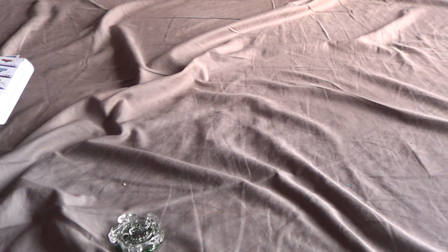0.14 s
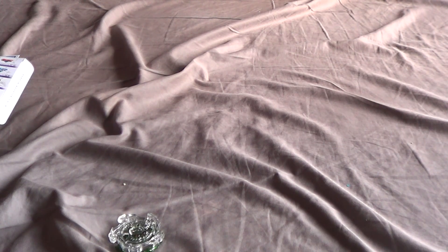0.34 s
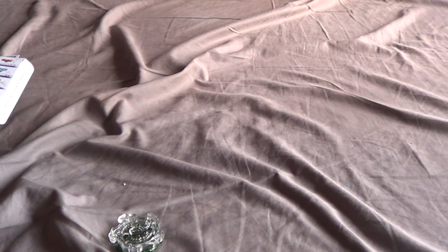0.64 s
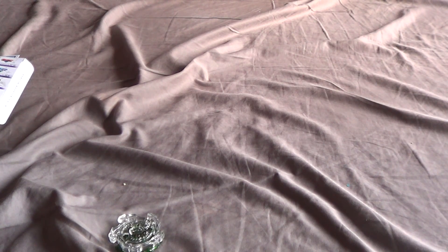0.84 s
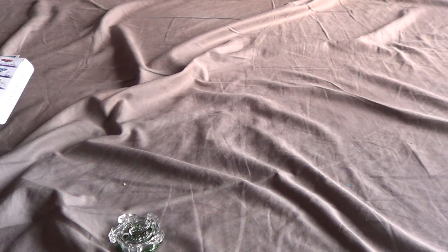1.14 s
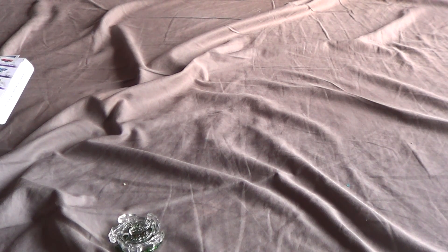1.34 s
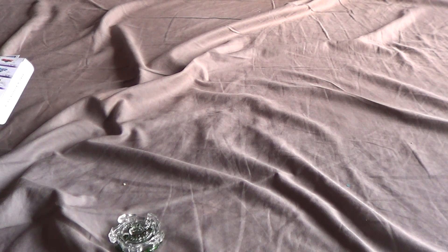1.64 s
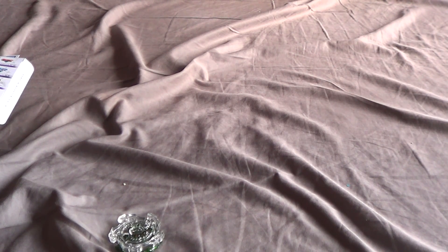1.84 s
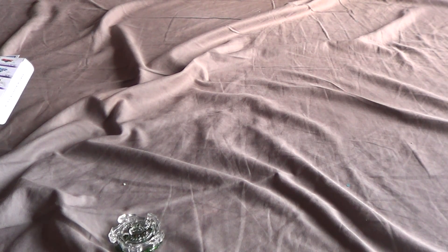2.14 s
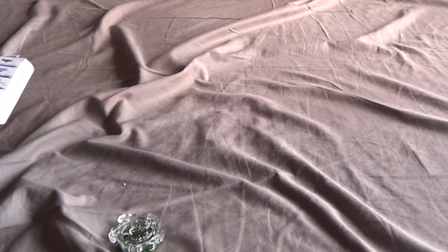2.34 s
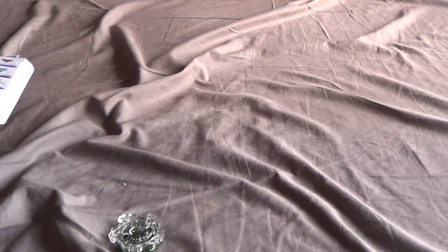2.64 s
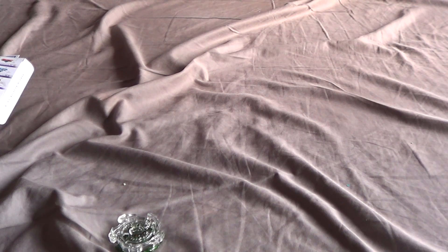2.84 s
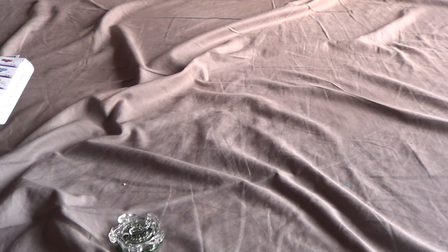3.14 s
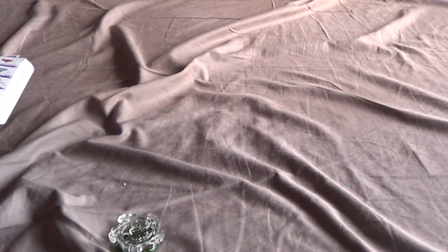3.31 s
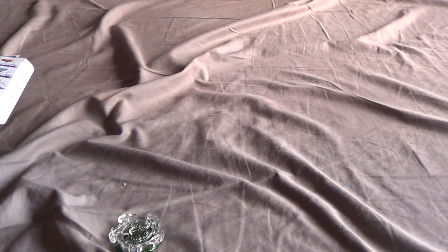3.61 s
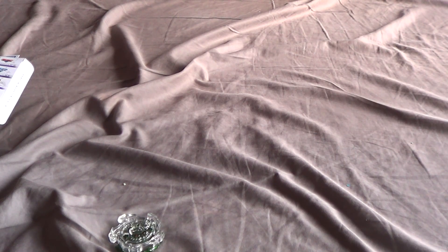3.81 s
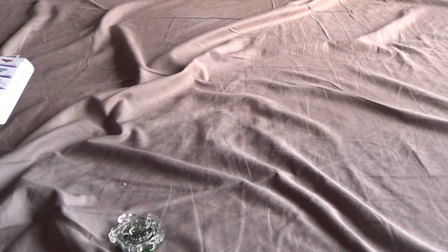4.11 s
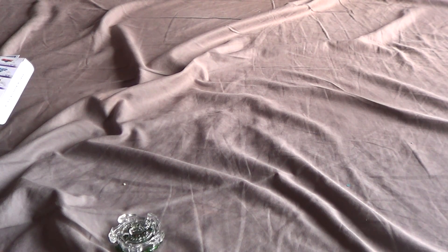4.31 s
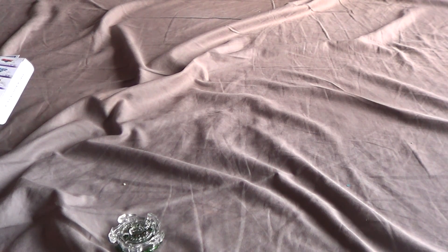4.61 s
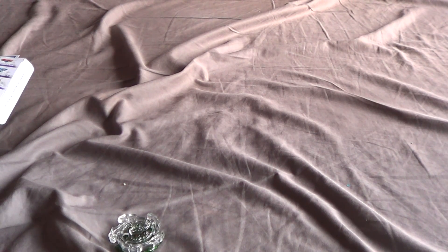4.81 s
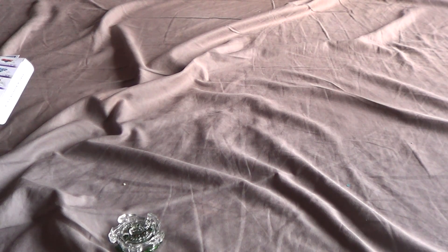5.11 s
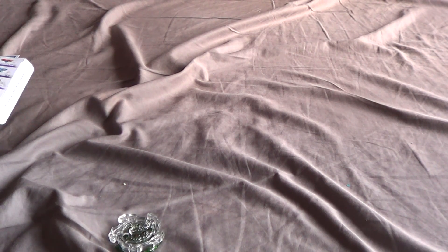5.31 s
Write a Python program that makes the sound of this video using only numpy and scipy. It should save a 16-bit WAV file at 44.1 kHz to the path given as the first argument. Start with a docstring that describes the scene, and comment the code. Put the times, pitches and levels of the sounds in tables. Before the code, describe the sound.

A little piece of plastic film packaging is handled indoors, mostly on the left of a stereo picture. Quiet crinkling comes in separate finger moves, nearly pausing around two seconds, then grows into bright brittle crackling with the loudest snaps near three and a half seconds. More bursts follow, busy again at the end. Soft low thuds of fingers, short room reflections, low steady hiss and a faint electrical whine.

```python
"""A faint hiss and a thin electrical whine, then a small plastic wrapper turned and pulled open by hand, to the left.
Its creases snap singly: a flick and a shiver of noise ring a facet of film and the whole sheet.
Random clicks make flurries of crackle and the hiss of film sliding over film.
Hands bump softly as damped sines with scuffs; short decaying-noise echoes answer from the bedroom."""
import sys
import numpy as np
from scipy import signal
from scipy.fft import rfft, irfft, next_fast_len
from scipy.io import wavfile
from scipy.ndimage import map_coordinates

SR = 44100
rng = np.random.default_rng(int(sys.argv[2]) if len(sys.argv) > 2 else 0)


def wav_out(sig):
    """Save sig, one row per channel (or a flat mono array), as 16-bit PCM at SR to the path in sys.argv[1]."""
    wavfile.write(sys.argv[1], SR, np.round(np.clip(np.atleast_2d(sig).T, -1, 1) * 32767).astype(np.int16))


N = 240830

# singing band of the room: pitch_hz, width_hz (one resonance stage), level_db (steady tone)
SINGING = (2552, 175, -65)


def amp(db):
    """Decibels to amplitude ratio."""
    return 10 ** (np.asarray(db) / 20)


def unit(x):
    """Scale to rms 1."""
    return x / np.sqrt(np.mean(x ** 2) + 1e-20)


def along(points, hz):
    """Interpolate (Hz, value) points on a log frequency axis."""
    point_hz, value = np.transpose(points)
    return np.interp(np.log(hz + 1), np.log(point_hz + 1), value)


def wobble(knots_per_s):
    """Smooth random curve through normally distributed knots."""
    knots = rng.standard_normal(int(N * knots_per_s / SR) + 4)
    return map_coordinates(knots, [np.arange(N) * knots_per_s / SR])


def filtered(x, response):
    """Multiply the spectrum of x by a complex response of frequency."""
    n = x.shape[-1]
    padded = next_fast_len(n + 4096)
    spectrum = rfft(x, padded) * response(np.fft.rfftfreq(padded, 1 / SR))
    return irfft(spectrum, padded)[..., :n]


def resonance(f, hz, width_hz):
    """Causal response of one damped mode."""
    return 1j * f * width_hz / (hz * hz - f * f + 1j * f * width_hz)


def add(track, start_s, sound):
    """Mix a sound into the track in place, cut at the track's end."""
    part = track[..., max(round(start_s * SR), 0):][..., :sound.shape[-1]]
    part += sound[..., :part.shape[-1]]


def widen(pair, alike):
    """Two unrelated signals become left and right with the given correlation per frequency."""
    def mid_side_gains(f):
        angle = np.arccos(np.clip(along(alike, f), -1, 1)) / 2
        return np.array([np.cos(angle), np.sin(angle)])

    mid, side = filtered(pair, mid_side_gains)
    return np.array([mid + side, mid - side])


def room_tone(air_db=-54.0, whine_hz=15734, whine_db=-61.0, ripple_hz=10.8, ripple_depth=0.19):
    """Steady shaped noise, a narrow singing band, and a thin electronic whine with a slight level ripple."""
    # hiss spectrum: pitch_hz, density_db (per Hz, relative)
    air_spectrum = [(10, -6), (25, -3.5), (60, -2.5), (200, -0.5), (400, -2.5), (720, -5.5), (1300, -8.5),
                    (2000, -9.5), (3000, -11.5), (3700, -8.5), (5000, -15.5), (7000, -16.5), (12700, -19),
                    (15400, -14.5)]
    # left-right correlation: pitch_hz, likeness (0-1)
    air_likeness = [(30, 0.85), (70, 1), (150, 0.61), (300, 0.21), (1000, 0.043), (4000, 0.39),
                    (12000, 0.94)]
    sing_hz, sing_width_hz, sing_db = SINGING
    air_noise = widen(rng.standard_normal((2, N)), air_likeness)
    air = unit(filtered(air_noise, lambda f: amp(along(air_spectrum, f))))
    sing_noise = widen(rng.standard_normal((2, N)), air_likeness)
    sing = unit(filtered(sing_noise, lambda f: resonance(f, sing_hz, sing_width_hz) ** 3))
    phase_per_hz = 2 * np.pi * np.arange(N) / SR
    ripple = 1 + ripple_depth * np.sin(ripple_hz * phase_per_hz)
    whine = unit(np.sin(whine_hz * phase_per_hz) * ripple)
    return amp(air_db) * air + amp(sing_db) * sing + amp(whine_db) * whine


def room_tail(first_wall_s=0.005, early_db=3, early_decay_s=0.012):
    """Nearby surfaces answer within milliseconds; the tail dies at a rate set per frequency."""
    # decay: pitch_hz, t60_s (before the early boost)
    decay_times = [(200, 0.35), (800, 0.28), (2500, 0.26), (6000, 0.36), (10000, 0.27), (15000, 0.23)]
    # left-right correlation: pitch_hz, likeness (0-1)
    tail_likeness = [(150, 1), (600, 0.13), (3000, 1), (8000, 0.4), (13000, 1)]
    hz, frame_s, bins = signal.stft(rng.standard_normal((2, SR // 3)), SR, nperseg=256)
    decay = amp(-60 * frame_s / along(decay_times, hz)[:, None])
    tail = signal.istft(bins * decay, SR, nperseg=256)[1]
    t = np.arange(tail.shape[1]) / SR
    onset = np.minimum(t / first_wall_s, 1) ** 2
    early_boost = 1 + amp(early_db) * np.exp(-t / early_decay_s)
    # unit energy, averaged over the two channels
    return unit(widen(tail * onset * early_boost, tail_likeness)) / np.sqrt(len(t))


def room(x, wet_db=-3, ring_db=-2, part_count=28):
    """The wrapper keeps turning, so each stretch of it meets a different pattern of echoes."""
    echo = np.zeros((2, N))
    for part in np.array_split(np.arange(N), part_count):
        add(echo, part[0] / SR, signal.fftconvolve(x[:, part], room_tail(), axes=1))
    # echo boosted at the pitch where the room tone sings
    sing_hz, sing_width_hz, _ = SINGING
    return amp(wet_db) * filtered(echo, lambda f: 1 + amp(ring_db) * resonance(f, sing_hz, sing_width_hz))


def bumps(damping=0.97, scuff_db=0, rise_s=0.0015):
    """Soft contacts of hands and packet: a sine push dying in a few cycles, with a low noise scuff."""
    # start_s, level_db (relative), pitch_hz, decay_s (extra decay of push, sole decay of scuff)
    contacts = [(.424,-46,220,0.0097), (1.342,-53.5,322,0.017), (1.725,-50.5,330,0.0064),
                (2.647,-40.5,437,0.0058), (4.201,-39.5,567,.0053), (4.323,-42.5,450,0.0067),
                (4.639,-41,376,0.0059), (4.651,-45,694,0.017), (4.671,-45,80,0.019), (4.795,-50.5,323,.025),
                (5.038,-47.5,245,0.028), (5.18,-48,620,.045), (5.327,-37,265,0.0072)]
    out, t = np.zeros(N), np.arange(SR // 5) / SR
    for start_s, level_db, hz, decay_s in contacts:
        noise = rng.standard_normal(len(t))
        scuff = unit(filtered(noise, lambda f: resonance(f, hz, damping * hz) * resonance(f, hz, 2 * hz)))
        push = 2 * np.sin(2 * np.pi * hz * t) * np.exp(-hz * t / 2)
        envelope = np.exp(-t / decay_s) * (1 - np.exp(-t / rise_s))
        add(out, start_s, amp(level_db) * (push + amp(scuff_db) * scuff) * envelope)
    return out


def hand_work(hold_crumple_db=-66, hold_slide_db=-58.5, attack_share=0.41, release_share=0.43):
    """Crumpling and sliding drive in dB: each move swells, holds and fades over a light steady grip."""
    # finger moves: start_s, length_s (held part), crumple_db, slide_db (relative drives)
    moves = [(0.041,.13,-53,-52.5), (0.233,.2,-54,-53), (0.796,0.29,-59,-53.5), (1.184,0.043,-50.5,-49.5),
             (1.293,0.1,-50,-50.5), (1.567,0.18,-50,-53.5), (2.118,0.088,-70,-60), (2.421,0.025,-49.5,-53),
             (2.585,0.053,-47,-47.5), (2.878,.05,-52.5,-53), (3.106,0.061,-52.5,-61), (3.308,.09,-48,-49),
             (3.566,0.042,-46.5,-49), (3.675,0.075,-47,-52.5), (3.897,0.091,-49,-53.5),
             (4.208,0.066,-48,-49.5), (4.273,0.053,-49.5,-41.5), (4.411,0.12,-52,-48.5),
             (4.658,0.057,-49,-49.5), (4.787,0.064,-51.5,-52), (5.044,0.048,-48.5,-51.5),
             (5.175,0.046,-47,-46), (5.277,.06,-45.5,-50), (5.436,.04,-53,-41.5)]
    t = np.arange(N) / SR
    # the film stirs even while only held
    power = amp([[hold_crumple_db], [hold_slide_db]]) ** 2 * np.ones(N)
    for start_s, length_s, crumple_db, slide_db in moves:
        progress = (t - start_s) / length_s
        # attack and release time constants are shares of the move's length
        away = np.maximum(-progress, 0) / attack_share + np.maximum(progress - 1, 0) / release_share
        near = away < 10
        power[:, near] += (amp([[crumple_db], [slide_db]]) * np.exp(-away[near])) ** 2
    return 10 * np.log10(power)


def grains(per_s, spread_db, scatter):
    """Random clicks of overall rms 1, their sizes spread exponentially in dB, partly differing left to right."""
    fires = rng.random(N) < per_s / SR
    size = amp(spread_db * np.minimum(rng.exponential(size=N), 3))
    polarity = np.sign(rng.standard_normal(N))
    return unit(fires * size * (polarity + scatter * rng.standard_normal((2, N))))


def rustle(crumple_trim_db=-4, slide_trim_db=-4, fizz_trim_db=-9,
           fizz_hz=11000, fizz_width_hz=3500, relative_width=0.27):
    """Small wrinkles crackle in clumps under the fingers; sliding film gives a much finer hiss."""
    # spectra of crackle and hiss: pitch_hz, gain_db (per Hz, relative)
    crumple_spectrum = [(100, 3), (300, -4), (600, 5), (1200, 4.5), (3000, 4.5), (6000, -1), (10000, -10.5),
                        (16000, -3)]
    slide_spectrum = [(200, -31), (1500, -12), (4000, 3), (7000, 6), (10000, 3.5), (12500, -1.5),
                      (16000, -29)]
    crumpling, sliding = hand_work()
    # wrinkles of every size take turns, each size with its own pitch
    wrinkles = np.zeros((2, N))
    for hz in np.geomspace(400, 11000, num=12):
        clumping = amp(2.6 * wobble(40))
        clicks = grains(per_s=260, spread_db=1.0, scatter=0.78)
        wrinkles += clumping * filtered(clicks, lambda f: resonance(f, hz, relative_width * hz))
    crackle = unit(filtered(wrinkles, lambda f: amp(along(crumple_spectrum, f))))
    specks = grains(per_s=5000, spread_db=1, scatter=0.3)
    rubbing = grains(per_s=7000, spread_db=-0.5, scatter=0.67)
    hiss = unit(filtered(rubbing, lambda f: amp(along(slide_spectrum, f))))
    fizz = unit(filtered(specks, lambda f: resonance(f, fizz_hz, fizz_width_hz) ** 2))

    def moving(drive_db, stick_db):
        """Gain that drops steeply below stick_db, where a light grip lets the film stick."""
        return amp(drive_db) / (1 + amp(1.94 * (stick_db - drive_db)))

    # only strong sliding fizzes
    return (amp(crumple_trim_db) * moving(crumpling, stick_db=-57.5) * crackle
            + amp(slide_trim_db) * moving(sliding, stick_db=-60.5) * hiss
            + amp(fizz_trim_db) * moving(sliding, stick_db=-48) * fizz)


def buckle(t, shiver_s, flick_s, flick_weight_s, apart):
    """One crease flips with a sharp flick; the slower it gives way, the more of it is a shiver of film."""
    noise = rng.standard_normal((4, len(t)))
    flick = np.exp(-t / flick_s) * np.cos(np.pi * t / (2 * flick_s))
    swell = np.exp(-t / shiver_s) * (1 - np.exp(-t / (0.25 * shiver_s)))
    tremble = (noise[0] + apart * noise[1:3]) * swell  # differs a little left to right
    polarity = np.sign(noise[3, 0])
    return polarity * unit(flick) * flick_weight_s / shiver_s + unit(tremble)


def snaps(body_hz=1000, body_width_hz=1500, low_hz=420, high_hz=11500, skirt=5):
    """Each larger crease rings its own facet of film and the whole sheet, at set proportions."""
    # start_s, level_db (relative, over 4 ms), facet_hz, facet_width_hz, body_db (re facet)
    creases = [(.0637,-41,3600,2300,-5), (.111,-38,3800,3020,-1.5), (.326,-46,5100,5000,-18),
               (.345,-45,4970,250,-23), (.4227,-44,5500,3100,0), (1.165,-44.5,3200,2500,-8),
               (1.183,-43.5,3000,4000,-10), (1.218,-43,3000,2500,1), (1.233,-41.5,5900,2500,-7),
               (1.291,-43.5,2300,2400,-23), (1.342,-38.5,1900,1200,-2), (1.372,-37.5,3320,2980,-3),
               (1.509,-31,7170,2600,-9), (1.5749,-43,2650,2800,1), (1.6325,-46,3270,5000,-16),
               (1.6474,-38,3500,3600,-7), (1.65,-34,3970,5000,-10), (1.659,-38.5,4500,2500,-5),
               (1.775,-37.5,4370,3000,4), (2.4182,-40,2270,4530,-8), (2.572,-41,3200,5000,5),
               (2.594,-39.5,2000,3000,6), (2.6209,-44,2900,1800,0), (2.6461,-36,1190,1500,2),
               (2.855,-36,4440,1100,-14), (2.8856,-35.5,3740,4500,-5.5), (2.8978,-42,2500,2400,-9),
               (2.9467,-30.5,6700,13000,-19), (2.95,-31.5,4600,13000,-10.5), (2.963,-35.5,4100,6000,-3),
               (3.0237,-36.5,3880,2200,-2.5), (3.1391,-38,3980,2600,7), (3.1723,-33.5,6700,1980,-1),
               (3.175,-33.5,4320,2900,-9), (3.149,-38.5,3530,2000,4), (3.2195,-32,3320,3400,-14),
               (3.329,-36,2630,2800,-17), (3.3398,-38,3240,7000,-17), (3.351,-37.5,3100,5000,2),
               (3.358,-31,14700,1800,-16), (3.4007,-25,4900,6500,-8.5), (3.403,-29.5,4150,6500,-7),
               (3.4109,-30,5600,9000,-27), (3.4158,-26,2850,1200,-25), (3.4227,-28,5360,7000,-29),
               (3.4356,-28,4100,7000,-38), (3.59,-30.5,3140,1970,-10.5), (3.599,-34,9000,12000,-7),
               (3.655,-34,3600,2200,-5.5), (3.722,-26,5130,3300,-30), (3.7239,-29,9600,4500,-27),
               (3.7396,-32.5,3160,3100,-27), (3.747,-36.5,3040,1500,-25), (3.7595,-34.5,3020,1900,-12),
               (3.8887,-38.5,3740,3200,-6), (3.9004,-36.5,2420,1500,-17), (3.9071,-34,5030,4700,-7),
               (3.989,-42,12100,8500,-7), (4.0275,-36.5,2580,4000,-13), (4.0583,-31.5,3300,2550,-19),
               (4.144,-45,800,900,-7), (4.194,-36,4730,2800,-6), (4.219,-39,1680,1100,-10),
               (4.229,-41.5,4400,5400,-10), (4.261,-32.5,13600,5500,-7.5), (4.2696,-36.5,2220,1000,-24),
               (4.2935,-34.5,3160,7900,0), (4.3095,-34.5,7540,3000,-6), (4.322,-38,8400,3500,6),
               (4.6175,-31.5,10300,2000,-21), (4.6385,-39,7050,7000,2), (4.9425,-41,2900,900,-4.5),
               (5.0377,-37.5,7050,2500,-6), (5.0511,-36.5,2720,2960,-6.5), (5.0992,-36,4230,7040,-4.5),
               (5.2535,-34.5,5540,3000,5.5), (5.2792,-35.5,4900,2700,9), (5.2937,-27,7600,4400,-10.5),
               (5.323,-31,6300,6000,-13), (5.329,-32.5,7500,3500,-1), (5.331,-31.5,7300,2000,-4.5)]
    out, t = np.zeros((2, N)), np.arange(1024) / SR
    to_level = np.sqrt(0.004 * SR / len(t))  # rms over 4 ms

    def sheet(f):
        """So small a sheet radiates little bass, and its highest notes are damped."""
        bass_cut = 1j * f / (low_hz + 1j * f)
        return bass_cut / (1 - (f / high_hz) ** 2 + 1j * np.sqrt(2) * f / high_hz)

    for start_s, level_db, hz, width_hz, body_db in creases:
        # 1.9 ms at -36 dB and 4 kHz; harder snaps and small, high facets flip faster
        shiver_s = 0.0019 * np.exp(-0.1 * (level_db + 36)) * (4000 / hz) ** 0.29

        def flip():
            return buckle(t, shiver_s, flick_s=0.00003, flick_weight_s=0.00045, apart=0.77)

        def facet_response(f):
            """The second, wider mode weakens sound far from the facet's pitch."""
            return sheet(f) * resonance(f, hz, width_hz) * resonance(f, hz, skirt * width_hz)

        facet = unit(filtered(flip(), facet_response))
        body = unit(filtered(flip(), lambda f: sheet(f) * resonance(f, body_hz, body_width_hz)))
        add(out, start_s, amp(level_db) * to_level * unit(facet + amp(body_db) * body))
    return out


def scene(direct_db=0.45, echo_lean=0.043):
    """The wrapper mostly to the left, its echo leaning less that way, and the quiet room."""
    # direct sound: pitch_hz, left_minus_right_db
    left_lean = [(200, -0.5), (700, 5.5), (1500, 4), (2600, 5), (4500, 5), (6500, 7), (9000, 5),
                 (13000, -1.5)]
    wrapper = snaps() + rustle() + bumps()

    def placed(x, lean):
        return filtered(x, lambda f: amp(lean * np.outer([1, -1], along(left_lean, f)) / 2))

    return amp(direct_db) * placed(wrapper, 1) + placed(room(wrapper), echo_lean) + room_tone()


def record(dry, top_hz=16000):
    """Remove everything from the band limit upward."""
    return filtered(dry, lambda f: f < top_hz)


dry = scene()
out = record(dry)
wav_out(out)
```